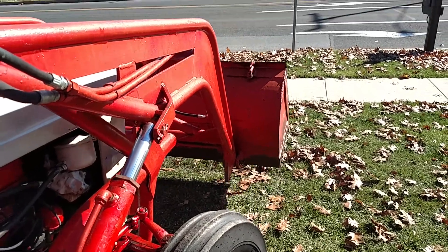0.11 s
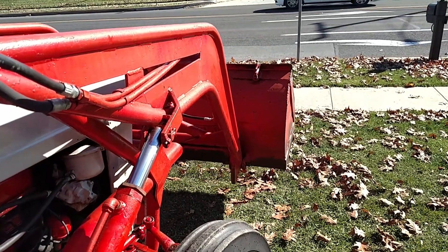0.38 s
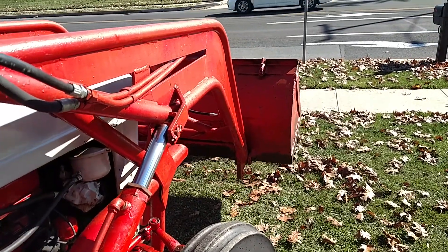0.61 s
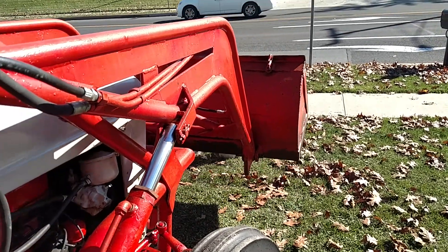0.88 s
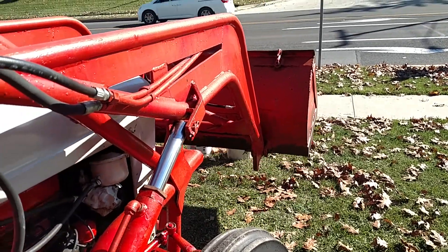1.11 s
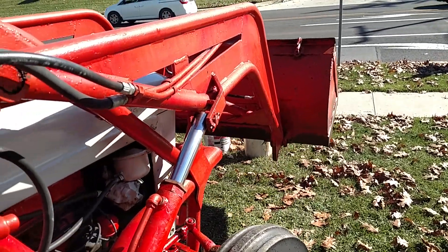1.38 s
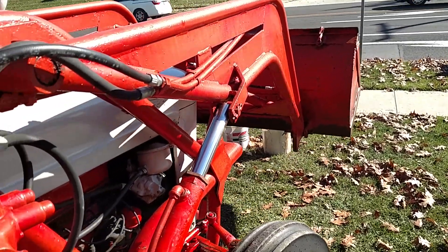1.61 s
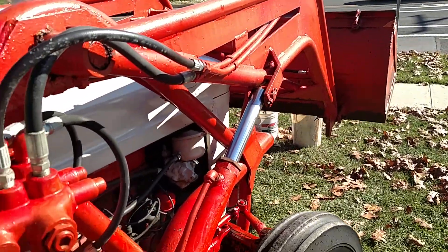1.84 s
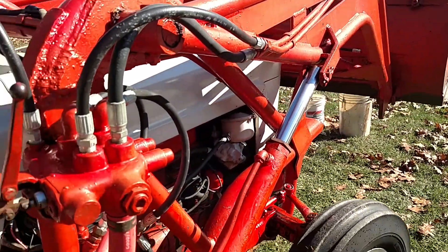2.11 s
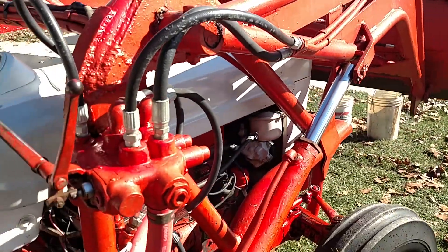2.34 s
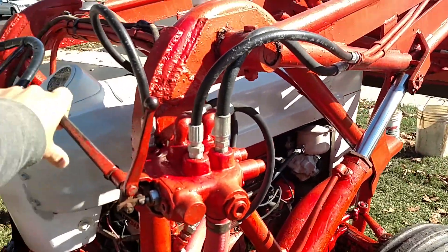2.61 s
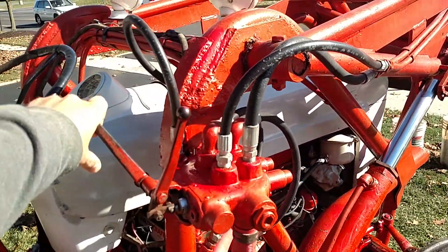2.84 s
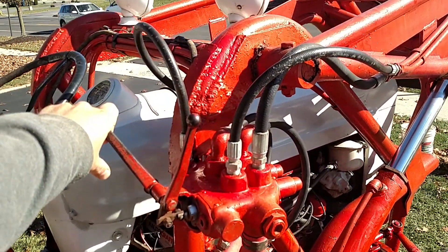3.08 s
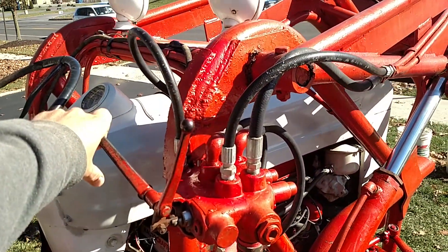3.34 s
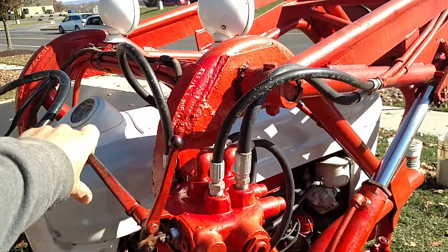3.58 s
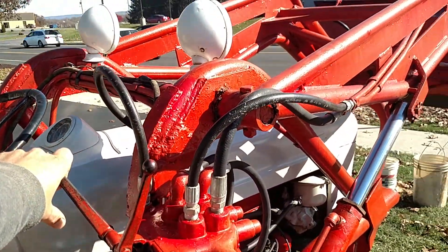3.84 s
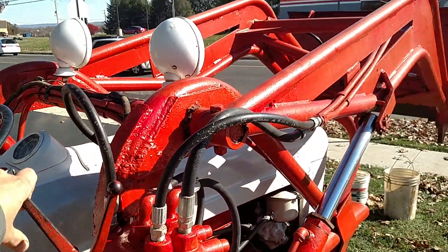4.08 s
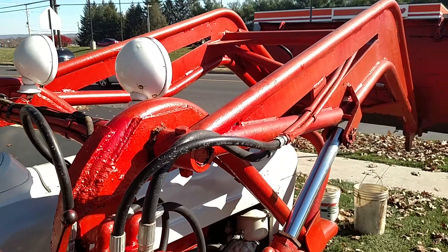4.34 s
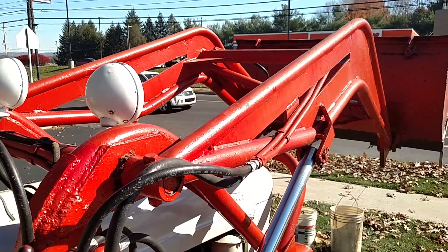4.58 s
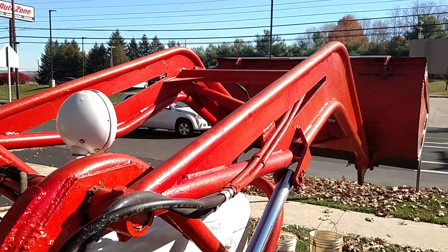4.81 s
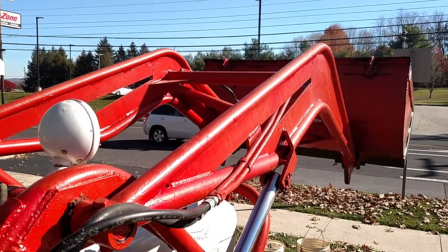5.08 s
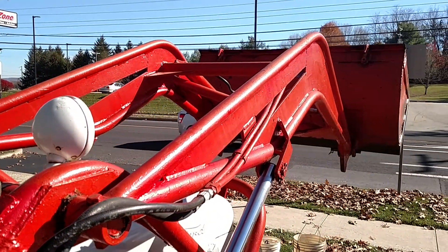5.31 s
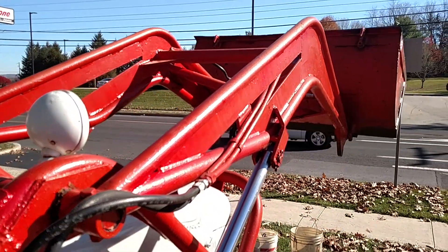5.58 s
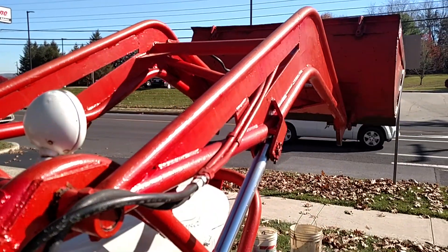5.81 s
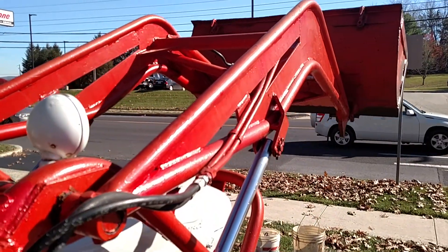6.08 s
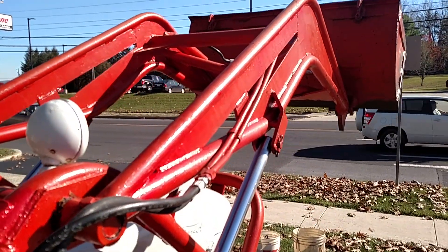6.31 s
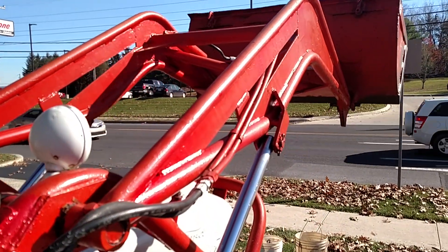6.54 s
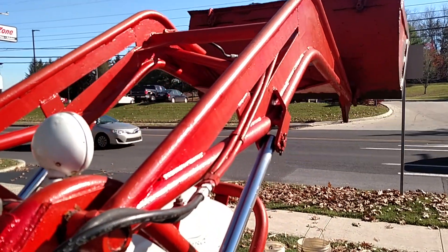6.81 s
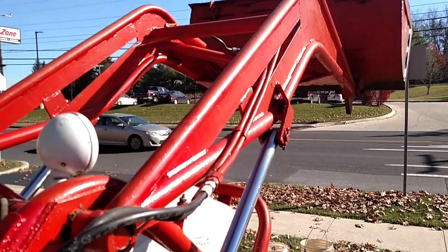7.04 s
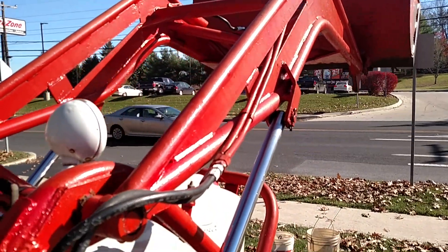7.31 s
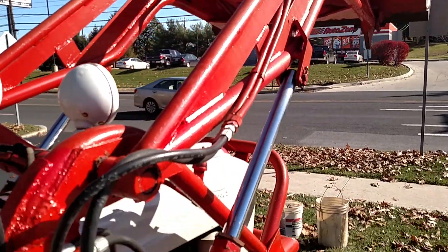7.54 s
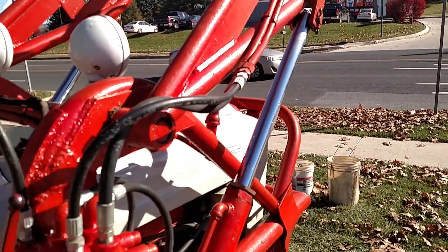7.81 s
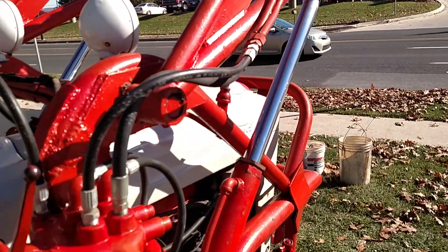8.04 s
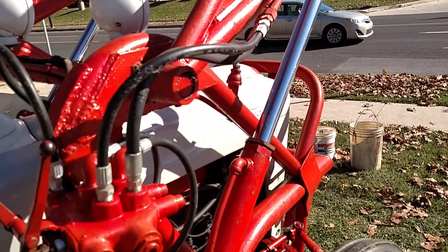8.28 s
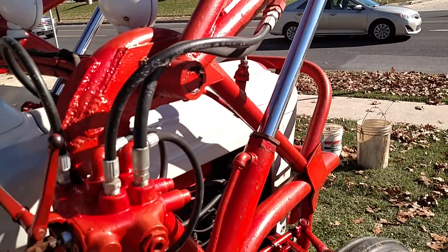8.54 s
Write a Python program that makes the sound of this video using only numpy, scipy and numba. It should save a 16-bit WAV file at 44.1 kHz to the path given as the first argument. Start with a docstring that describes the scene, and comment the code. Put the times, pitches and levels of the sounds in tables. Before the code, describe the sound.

An old tractor idles continuously on a lawn, heard close and dry on a small phone microphone. Uneven-strength exhaust beats make a low, rumbling purr beneath metallic valve clatter and hollow sheet-metal fan noise. The ticking sharpens when the phone faces the levers, while low wind buffeting peaks around three seconds and briefly ducks the sound. From about five seconds a low droning hum comes and goes; the idle never changes much.

```python
"""An old four-cylinder tractor idles on a lawn; a phone held beside it first faces the bucket, under thin hiss.
Exhaust and intake pulses ring their pipes, tappet noise ticks at each firing, and fan air roars in sheet metal.
From about 2 s the phone faces the levers, and low-frequency wind noise thumps its microphone, hardest near 3 s.
Then it turns to the raised arms: the gear-pump tone swells, a belt tone beats with it all along, and a low
hum comes and goes near 6 s; by the end it faces levers and arms. Gain control ducks the loud peaks."""
import sys
import numpy as np
from scipy import signal
from scipy.fft import rfft, irfft
from scipy.io import wavfile
from numba import njit

SR = 44100
rng = np.random.default_rng(int(sys.argv[2]) if len(sys.argv) > 2 else 0)


def volts_from_decibels(level):
    """Turn decibel levels (scalar or array-like) into linear amplitude factors."""
    exponent = np.asarray(level, float) / 20
    return 10 ** exponent


def generate_wav(sig):
    """Save sig (samples, or channels by samples) to the path in sys.argv[1] as 16-bit PCM at SR."""
    pcm = np.round(np.clip(np.atleast_2d(sig).T, -1, 1) * 32767).astype(np.int16)
    wavfile.write(sys.argv[1], SR, pcm)


N = 381899
T = np.arange(N) / SR
HZ = np.arange(N // 2 + 1) * SR / N + 1e-3  # the offset avoids division by zero

# crankshaft speed: (t/s, turns per minute)
SPEED = [(0.0, 1004.68), (0.333, 989.3), (0.666, 995.09), (1.998, 989.97), (2.998, 999.18), (3.664, 989.21),
         (3.997, 994.46), (4.33, 986.18), (4.663, 984.07), (4.996, 986.9), (6.662, 978.53), (6.995, 986.43),
         (7.328, 982.51), (7.661, 995.24), (7.994, 983.03), (8.66, 982.31)]
FIRST_CYCLE_S = 120 / SPEED[0][1]  # two crank turns at the opening speed
# cylinders in firing order:
# (exhaust level/dB, exhaust lag/ms, intake level/dB, intake lag/ms, valve tick level/dB), levels relative
CYLINDERS = [(3.5, 6.78, 1.2, -6.82, 0), (3.5, 6.29, 3.8, -11.21, -5), (7.4, 6.85, 3.0, -11.31, -3),
             (6.7, 7.09, 6.6, -12.78, -1.5)]
# where the phone points: (t/s, share of bucket, share of levers, share of raised arms)
FACING = [(0, 0.96, 0, 0), (1.2, 0.8, 0.18, 0.0073), (1.86, 0.8, 0.11, 0.022), (1.9, 0.23, 0.17, 0.45),
          (2.4, 0, 1, 0.051), (4.3, 0, 0.93, 0.14), (4.75, 0.019, 0, 0.99), (7.55, 0.035, 0.024, 0.93),
          (7.75, 0.012, .35, 0.53), (8.66, 0.066, 0.48, 0.46)]


def level(x, db):
    """Scale to an rms level."""
    return x * volts_from_decibels(db) / np.sqrt(np.mean(x ** 2))


def shape(x, gain):
    """Filter by a gain for each frequency."""
    return irfft(rfft(x) * gain, N)


def colour(points):
    """Gain curve through (f/Hz, level/dB) points joined on a log frequency axis."""
    hz, db = np.transpose(points)
    return volts_from_decibels(np.interp(np.log(HZ), np.log(hz), db))


def ring(hz, width):
    """Response of one resonance, 1 at its centre."""
    return 1j * HZ * width / (hz ** 2 - HZ ** 2 + 1j * HZ * width)


def walk(rate):
    """Random wander of rms 1, mostly slower than rate in Hz."""
    return level(shape(rng.standard_normal(N), 1 / (1 + (HZ / rate) ** 2)), 0)


def follow(waver_db, rule):
    """A layer's level from the shared level and from where the phone points."""
    slope, *extra_db = rule
    s, *shares = np.transpose(FACING)
    facing_db = sum(db * np.interp(T, s, share) for db, share in zip(extra_db, shares))
    return slope * waver_db + facing_db


def hiss():
    """Thin high noise from narrow resonances, in one slow fade and one brief swell."""
    # swells: (t/s of the peak, length/s, f/Hz, width/Hz, level/dB of the noise before the envelope)
    swells = [(0.492, 2.7, 11080, 1516, -74.5), (1.113, 0.091, 11100, 1800, -70.5)]
    noise = rng.standard_normal(N)
    out = 0
    for at, length, hz, width, db in swells:
        envelope = np.exp(-((T - at) / length) ** 2)
        out = out + level(shape(noise, ring(hz, width) ** 2), db) * envelope
    return out


def wind():
    """Low noise flutter on the microphone port, raised by gusts, plus soft 45 Hz thumps."""
    # gusts: (t/s of the peak, length/s, rise of the level/dB)
    gusts = [(.8, .2, 5.3), (1.8, .15, 4.8), (2.55, 0.16, 8.8), (3.04, 0.13, 26), (3.5, 0.55, 5.3),
             (4.25, .15, 7.7), (4.9, 0.22, 4), (8.14, 0.17, 5)]
    # single puffs: (t/s, level/dB before the boost below)
    puffs = [(2.279, -30), (2.369, -29), (2.509, -26), (2.964, -26), (3.09, -21), (3.292, -31.5),
             (3.593, -32), (3.86, -33), (4.161, -35)]
    calm_db, puff_boost_db = -44.5, 5.5
    wind_db = calm_db + sum(db * np.exp(-((T - s) / length) ** 2) for s, length, db in gusts)
    port = colour([(5, -15.0), (30, 0.5), (60, -2), (110, -3.0), (200, -33.5), (2000, -100)])
    flutter = level(shape(rng.standard_normal(N) * volts_from_decibels(2.7 * walk(12)), port), -2) * volts_from_decibels(wind_db)
    thumps = 0
    for s, db in puffs:
        envelope = np.exp(-((T - s - .015) / 0.007) ** 2)
        thumps = thumps + volts_from_decibels(db + puff_boost_db) * envelope * np.sin(2 * np.pi * 45 * (T - s))
    return flutter + thumps


def hum():
    """A low, slightly rough sine whose level and phase waver as it swells and fades."""
    # (t/s of the peak, rise/s, fall/s, f/Hz, rms level/dB at the peak before its waver)
    at, rise, fall, hz, db = (6, 0.45, .3, 228, -18)
    swell = np.exp(-((T - at) / np.where(T < at, rise, fall)) ** 2)
    tone = np.sin(2 * np.pi * hz * T + 0.22 * walk(6))
    return np.sqrt(2) * swell * volts_from_decibels(db + 1.1 * walk(8)) * tone


def belt(cycle):
    """A belt-driven tone just under the lowest pump tone, slipping behind it so the two beat slowly."""
    lag, slip_hz, slip_hz_per_s = .05, .666, -.0216  # lag in periods
    slip = lag + slip_hz * T + slip_hz_per_s * T ** 2 / 2
    return volts_from_decibels(-26.5 + 1.1 * walk(4)) * np.cos(2 * np.pi * (20 * cycle - slip))


def pump(cycle):
    """Ten gear teeth a turn press the oil: a tone at the tooth rate, wavering with pressure, and its multiples."""
    # tones: (multiple of the tooth rate, level/dB, lag/periods, drift/dB per s), the lowest one first
    (_, low_db, low_lag, _), *upper = [(1, -5, 0.044, 0), (2, -31, 0.18, -.5), (3, -38, 0.76, -0.5),
                                       (4, -37.5, .85, -2), (5, -48, 0.3, 1.03)]
    # level added to the lowest tone: (t/s, level/dB)
    swell_db = np.interp(T, *np.transpose([(0, -29), (1.6, -35.5), (2.8, -19), (4.0, -20.5), (4.9, -26),
                                           (5.5, -7.5), (6.0, -14.5), (6.8, -14), (7.5, -8.5), (7.7, -21),
                                           (8.15, -11.5), (8.66, -18.5)]))
    low_phase = 2 * np.pi * (20 * cycle - low_lag) + .2 * walk(3)
    out = volts_from_decibels(swell_db + low_db + 1.2 * walk(5)) * np.cos(low_phase)
    sway = walk(3.8)
    for k, db, lag, drift in upper:
        phase = 2 * np.pi * (20 * k * cycle - lag) + 0.1 * k * sway
        out = out + volts_from_decibels(db + drift * T + 2.5 * walk(5.4)) * np.cos(phase)
    return out


def knock(cycle):
    """A short metallic ring: noise near 3 kHz, decaying from four places in the engine cycle."""
    hits = 0
    for at, db in ((.09, 3), (.5, -4.5), (.57, -5), (.82, 1.5)):
        hits = hits + volts_from_decibels(db) * np.exp(-((cycle - at) % 1) / 0.037)
    return level(shape(rng.standard_normal(N) * hits, ring(3100, 750) ** 2), -62.0)


def gate(cycle, cylinder_db, at, floor, sharp):
    """An envelope that swells once per firing, by that cylinder's strength."""
    turn = 4 * cycle - at
    # the swell rises faster than it dies
    bump = (np.cos(np.pi * turn + .3 * np.cos(2 * np.pi * turn) - .3) ** 2) ** sharp
    return floor + bump * volts_from_decibels(cylinder_db[np.round(turn).astype(int) % 4])


def valves(cycle, times, ticks_db):
    """Tappet noise in a burst per firing over steady hiss; each burst has its own size."""
    # colour by where the phone points: (f/Hz, level/dB at the bucket, level/dB at the levers, level/dB at the arms)
    tick_colours = [(3440, 9, 13.5, 13), (3880, -1.2, 5, -5), (4300, 4, 7, 2.1), (4800, 2, 6, 1.2),
                    (5400, -4, 2, -6.5), (6000, 0.5, 0.5, 0.5), (6700, 0, -1.5, 1), (7300, -0.5, -6, -1.1),
                    (7900, -2.5, -9, -8), (8700, -4, -9, -11.5), (9400, -3, -9.5, -6.5),
                    (10200, -10, -12.3, -14.5), (10900, -7.5, -10, -9.5), (11700, -11, -16.5, -12.5),
                    (12600, -8.5, -16, -12), (13600, -8.5, -13.5, -18), (15400, -22.5, -23, -20.5)]
    own_db = np.interp(T, times, 0.66 * rng.standard_normal(len(times)))
    burst = gate(cycle, np.array(CYLINDERS)[:, 4], .27, 1.4, 1.4) * volts_from_decibels(own_db + 1.2 * walk(300))
    noise = rng.standard_normal(N) * burst
    # lower and upper ticks come from different parts and flicker apart
    lower = shape(noise, 1 / (1 + (HZ / 5700) ** 12))
    noise = lower * volts_from_decibels(1.4 * walk(25)) + (noise - lower) * volts_from_decibels(.8 * walk(40))
    hz, *colours = np.transpose(tick_colours)
    s, *shares = np.transpose(FACING)
    rise = 1 / (1 + (3800 / HZ) ** 12)  # keeps the ticks above 3.8 kHz
    out = 0
    for share, db in zip(shares, colours):
        facing = level(shape(noise, rise * colour(np.c_[hz, db])), 0.42)
        out = out + np.interp(T, s, share) * facing
    return volts_from_decibels(ticks_db) * out


def roar(cycle, low_db, mid_db, high_db):
    """Fan air and combustion noise through the panels; half-octave bands flicker on their own."""
    # air spectrum: (f/Hz, relative level/dB per Hz)
    air = [(40, -21.5), (75, -12.5), (100, -7), (140, -4), (185, -2), (250, -1.5), (370, -9), (420, -10.5),
           (530, -15.5), (560, -17.5), (900, -18.5), (1200, -20), (1700, -26), (2400, -38), (2700, -40.5),
           (3100, -38.5), (3700, -52), (4500, -60)]
    # sheet-metal resonances: (f/Hz, width/Hz, level/dB added on the air)
    panels = [(287.5, 36, -2.5), (357, 18, -4), (452, 8.7, -4.5), (516.6, 25, 0), (603, 15, -5),
              (728, 30, -4.5), (1000, 8, -10), (1182, 170, -5.5), (1415, 39, -2), (1520, 19, -3.5),
              (1776, 46, -6.5), (1900, 30, -4.5), (3235, 22, 1)]
    body = colour(air) * (1 + sum(volts_from_decibels(db) * abs(ring(hz, w)) ** 2 for hz, w, db in panels))
    noise = rfft(rng.standard_normal(N) * volts_from_decibels(1.0 * walk(196))) * body
    gust, out = walk(5.8), 0  # gust: a flicker that all bands share
    for hz in 40 * 2 ** np.arange(0, 7.5, .5):
        band = np.cos(np.pi / 2 * np.clip(2 * np.log2(HZ / hz), -1, 1)) ** 2
        turn_db = low_db if hz < 400 else high_db if 1400 < hz < 2600 else mid_db
        flicker_db = .5 * gust + 0.48 * walk(11)
        out = out + irfft(noise * band, N) * volts_from_decibels(turn_db - turn_db.mean() + flicker_db)
    # one cylinder is louder, so the roar leans once a cycle
    lean_db = 0.25 * np.cos(2 * np.pi * (cycle - .38))
    return level(out, -19.5) * volts_from_decibels(lean_db)


def firings(cycle):
    """Times of all firings, four to a cycle, and which cylinder fired."""
    count = np.arange(-1, int(4 * cycle[-1]))
    # reach one cycle back before the start
    times = np.interp(count / 4, np.r_[cycle[0] - 1, cycle], np.r_[-FIRST_CYCLE_S, T])
    return times, count % 4


def pulses(times, db):
    """One pressure pulse per firing, shared between two samples to fall at its exact time."""
    place = np.clip(times * SR, 0, N - 2)
    i, out = place.astype(int), np.zeros(N)
    size = (times >= 0) * volts_from_decibels(db) * SR * FIRST_CYCLE_S
    np.add.at(out, i, size * (1 - place + i))
    np.add.at(out, i + 1, size * (place - i))
    return out


def pipes(times, cylinder):
    """Pulses ring the pipes; each cylinder has its strength and runner length, each firing differs a little."""
    # pipe resonances: (f/Hz, width/Hz, relative level/dB, polarity)
    exhaust = [(29.1, 9.0, -48.7, 1), (73.0, 31.5, -35.2, 1), (96.5, 71.9, -31.3, -1),
               (133.1, 9.0, -30.3, -1), (143.5, 51.8, -29.4, 1), (193.6, 9.0, -36.5, -1)]
    intake = [(117.8, 9.0, -41.9, 1), (137.3, 10.0, -29.1, 1), (137.7, 30.7, -30.0, -1),
              (186.4, 72.1, -43.9, 1)]
    out_db, out_ms, in_db, in_ms = np.array(CYLINDERS)[cylinder, :4].T
    chance = rng.standard_normal((len(times), 4)).T
    sound = 0
    for modes, db, ms, k in ((exhaust, out_db, out_ms, 0), (intake, in_db, in_ms, 2)):
        beat = pulses(times + (ms + 0.18 * chance[k]) / 1000, db + 0.81 * chance[k + 1])
        response = sum(sign * volts_from_decibels(g) * ring(hz, w) for hz, w, g, sign in modes)
        sound = sound + shape(beat, response)
    # thinned below 70 Hz and above 500 Hz
    return shape(sound, (1j * HZ / (1j * HZ + 70)) ** 2 / (1 + (HZ / 500) ** 4))


def scene():
    """All engine sources ride on one engine cycle, two crank turns long."""
    # engine noise level as the phone turns: (t/s, level/dB, its mean is taken off below)
    noise_level = [(0, 2), (1.2, 1.5), (1.87, 2), (1.9, -1.5), (2.4, 1.5), (2.55, -.5), (3.05, 1.5),
                   (3.25, 0), (3.5, 1.5), (4.4, -1), (5.2, .5), (5.4, -2), (5.8, -1), (5.95, 1.5),
                   (6.2, -1), (7.55, -0.5), (7.75, 1.5), (8.3, 0), (8.66, -1)]
    # how layers follow it: (dB per dB, extra level/dB facing the bucket, the levers, the arms)
    low_rule, high_rule = (1.3, -0.51, 0.72, 0), (1.1, 1.6, 0, -1.4)
    ticks_rule, knock_rule, pipes_rule = (1, -1, 1.5, 0), (0.51, -2.2, .5, .5), (.1, -.2, -.3, 0.54)
    start_cycle, ticks_base_db = .03064, -58.5
    mid_db = np.interp(T, *np.transpose(noise_level))
    mid_db = mid_db - mid_db.mean()
    low_db, high_db = follow(mid_db, low_rule), follow(mid_db, high_rule)
    cycle = start_cycle + np.cumsum(np.interp(T, *np.transpose(SPEED))) / 120 / SR
    times, cylinder = firings(cycle)
    pipe = pipes(times, cylinder) * volts_from_decibels(follow(mid_db, pipes_rule))
    # the upper pipe tones move with the low roar
    upper = shape(pipe, 1 / (1 + (182 / HZ) ** 24))
    pipe = pipe + upper * (volts_from_decibels(1.8 * (low_db - low_db.mean())) - 1)
    tones = pipe + pump(cycle) + belt(cycle) + hum()
    ticks = valves(cycle, times, ticks_base_db + follow(mid_db, ticks_rule))
    knocks = knock(cycle) * volts_from_decibels(follow(mid_db, knock_rule))
    noises = roar(cycle, low_db, mid_db, high_db) + knocks + ticks + hiss()
    return (tones + noises + wind())[None]


@njit
def peak_follow(x, up, down, start):
    """Envelope that rises fast to peaks and sinks slowly."""
    out, e = np.empty(len(x)), start
    for i in range(len(x)):
        e += (x[i] - e) * (up if x[i] > e else down)
        out[i] = e
    return out


def low_pass(x):
    """Removes everything above the highest recorded frequency."""
    return signal.sosfilt(signal.butter(12, 15504, fs=SR, output="sos"), x)


def record(dry):
    """The phone's gain control ducks everything on peaks and creeps back; then loud peaks are rounded."""
    ceiling, attack_s, release_s = float(volts_from_decibels(-5.5)), .003, .6
    squeeze, makeup_db = 0.72, 1  # squeeze: share of the excess dB taken off
    envelope = peak_follow(np.abs(dry[0]), 1 / (attack_s * SR), 1 / (release_s * SR), ceiling)
    held = dry * volts_from_decibels(makeup_db) * np.minimum(ceiling / envelope, 1) ** squeeze
    soft = np.tanh(0.68 * held) / 0.66
    return low_pass(soft)


dry = scene()
out = record(dry)
generate_wav(out)
```